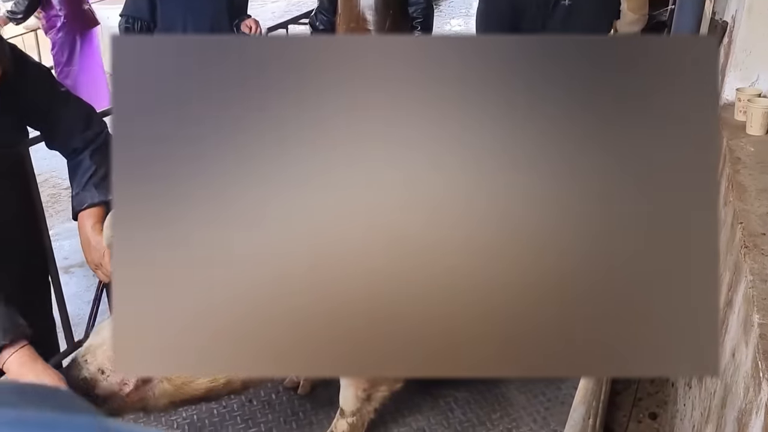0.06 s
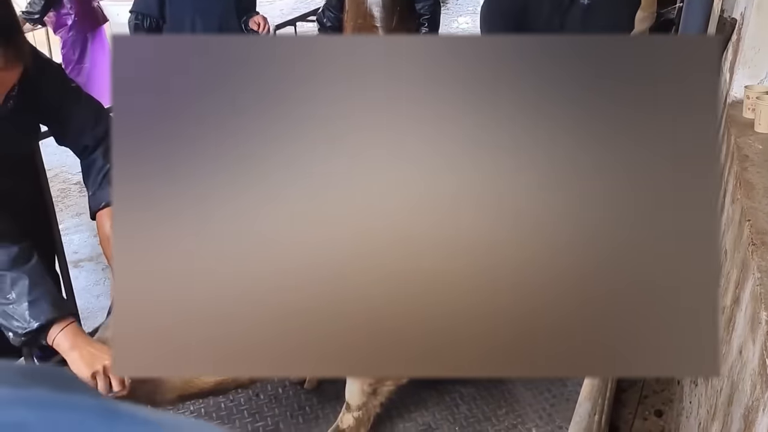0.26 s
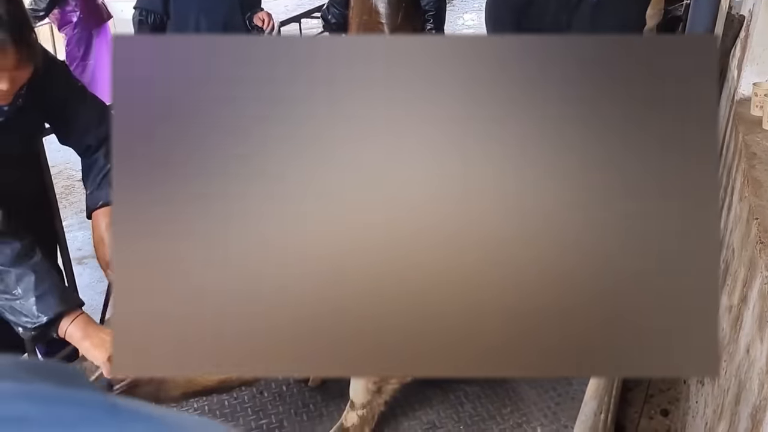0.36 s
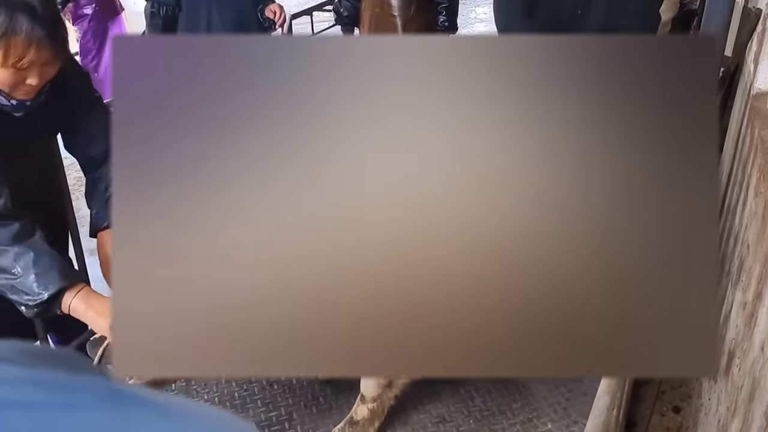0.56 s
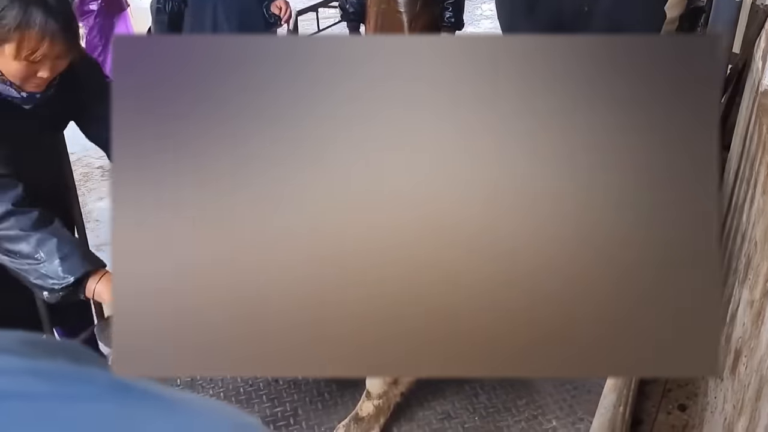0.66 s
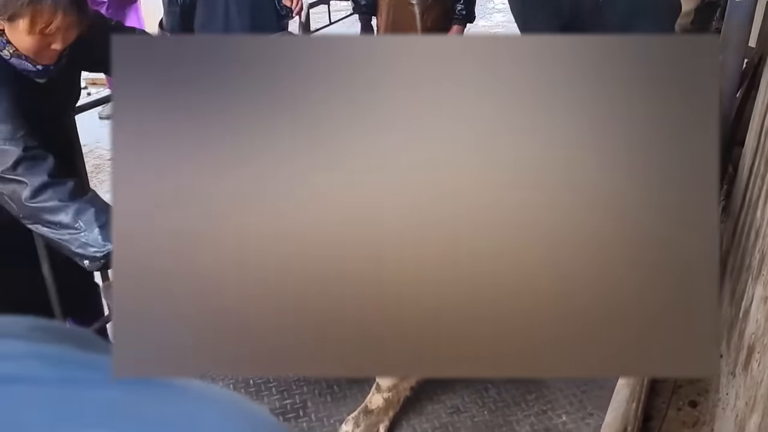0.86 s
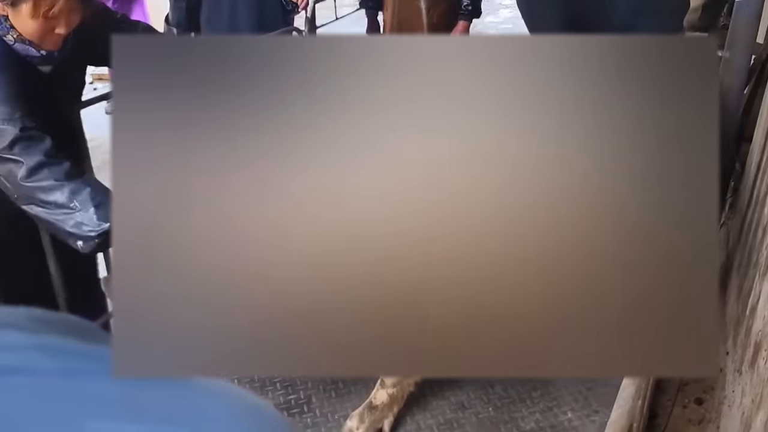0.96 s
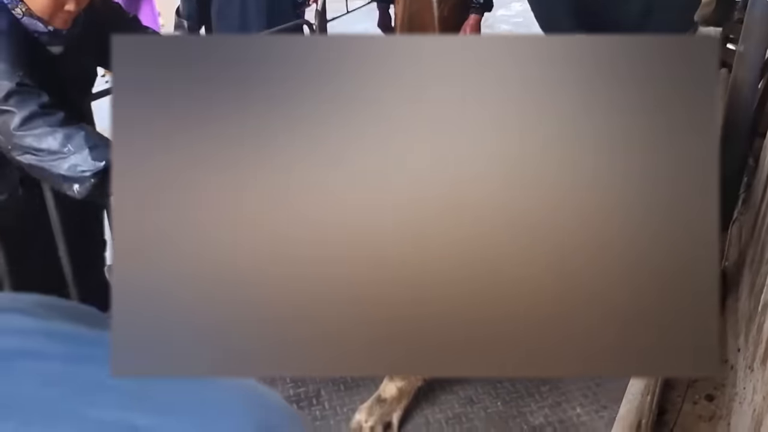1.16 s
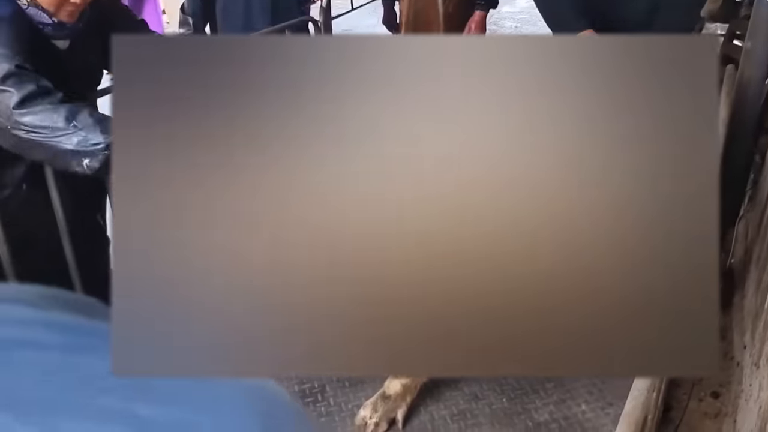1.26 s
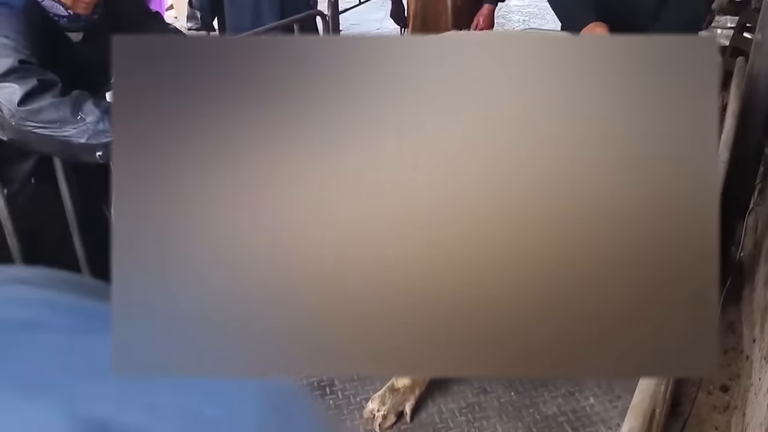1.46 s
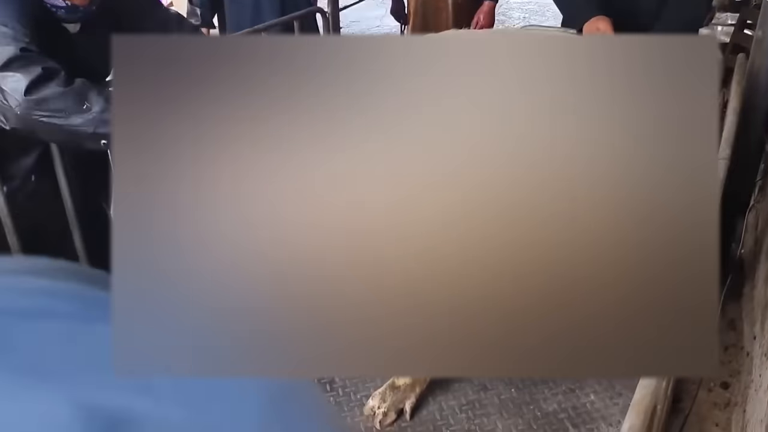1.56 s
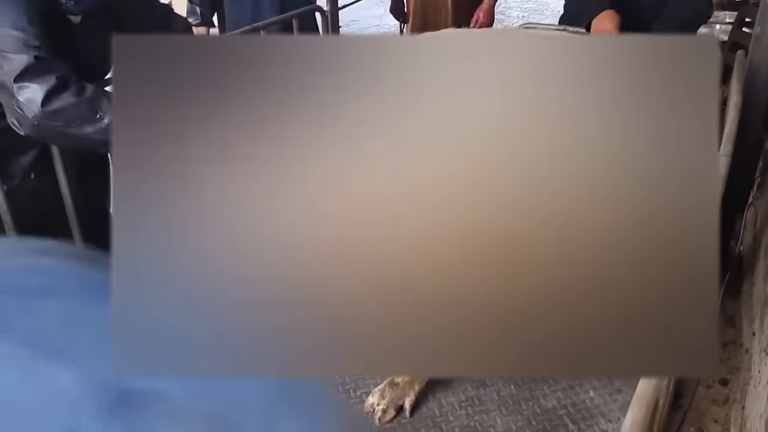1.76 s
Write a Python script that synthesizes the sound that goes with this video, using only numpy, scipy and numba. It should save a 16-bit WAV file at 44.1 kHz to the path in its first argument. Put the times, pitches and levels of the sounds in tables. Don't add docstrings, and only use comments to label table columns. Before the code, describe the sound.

A large pig, close and slightly left, growls from 0 to 0.75 s in a low, rattling flutter of about thirty flaps a second, swelling near 0.5 s. It becomes a hoot peaking around 0.87 s. A small grunt leads to a loud hoarse bark at 1.1-1.28 s, snorts near 1.38 s, a shorter airy bark at 1.5-1.6 s, then faint grunts. Short concrete reflections, low rumble and light hiss.

```python
import sys
import numpy as np
from scipy import signal
from scipy.fft import rfft, irfft, next_fast_len
from scipy.io import wavfile
from scipy.ndimage import uniform_filter1d, minimum_filter1d
from numba import njit

SR = 44100
rng = np.random.default_rng(int(sys.argv[2]) if len(sys.argv) > 2 else 0)


def linear_from_db(decibels):
    return 10 ** (np.asarray(decibels, float) / 20)


def inscribe(sig):
    pcm = np.round(np.clip(np.atleast_2d(sig).T, -1, 1) * 32767)
    wavfile.write(sys.argv[1], SR, pcm.astype(np.int16))


N = 79380
T = np.arange(N) / SR


def rms_one(x):
    return x / np.sqrt(np.mean(x ** 2) + 1e-20)


def coloured(points, channels):
    hz, db = np.transpose(points)
    f = np.maximum(np.arange(N // 2 + 1) * SR / N, 1)
    level_db = np.interp(np.log(f), np.log(hz), db)
    level_db = level_db - 30 * np.maximum(np.log(f / hz[-1]), 0)
    white = rfft(rng.standard_normal((channels, N)))
    return rms_one(irfft(white * linear_from_db(level_db), N))


# f/Hz, level per Hz/dB
PEN_SPECTRUM = [(30, 1.5), (140, 1.5), (370, 2.5), (610, 2.5), (900, 11), (1550, -27), (2120, -5.5),
                (7000, -58)]
PEN_DB = -46


def pen_background():
    noise = coloured(PEN_SPECTRUM, channels=3)
    return linear_from_db(PEN_DB) * (noise[0] + 0.2 * noise[1:])


# f/Hz, level per Hz/dB
HISS_SPECTRUM = [(5000, -0.5), (7000, -3), (8200, -16), (10200, -16), (11800, -11), (13200, -18.5),
                 (15000, -12)]
HISS_DB, HISS_START_DB, HISS_SETTLES_S = -47, 10.5, 0.21
HISS_FOLLOWS = 0.4


def microphone_hiss(pig):
    loud = uniform_filter1d(pig ** 2, size=1501) + 1e-5
    level = linear_from_db(HISS_DB + HISS_START_DB * np.exp(-T / HISS_SETTLES_S))
    return level * (loud / 0.011) ** (HISS_FOLLOWS / 2) * coloured(HISS_SPECTRUM, channels=2)


@njit
def glide(x, turn, r):
    y = np.zeros(len(x))
    for i in range(2, len(x)):
        y[i] = (1 - r * r) / 2 * (x[i] - x[i - 2]) + 2 * r * turn[i] * y[i - 1] - r * r * y[i - 2]
    return y


SKIRT = 0.3


def resonate(x, hz, width):
    turn = np.cos(2 * np.pi * hz / SR) * np.ones(N)
    r = np.exp(-np.pi * max(width * 1.4, 12) / SR)
    once = glide(x + 1e-18, turn, r)
    return SKIRT * once + (1 - SKIRT) * glide(once, turn, r)


PULSE_DB = [-3, -3, -5.5, -8.5, -11]
PULSE_GAP_S, PULSE_JITTER_S, PULSE_SOFT_HZ = 0.0067, 0.00044, 4400


def flap_source(flaps, starts, part, puff, rough, uneven_db):
    run = np.arange(len(PULSE_DB))
    draw = rng.standard_normal((len(starts), 2, len(run)))
    jitter = PULSE_JITTER_S * draw[:, 0] * (run > 0)
    when = starts[:, None] + PULSE_GAP_S * run + jitter
    pulses = np.zeros(N + SR)
    pulses[(np.abs(when) * SR).astype(int)] = linear_from_db(PULSE_DB + uneven_db * draw[:, 1]) * (when > 0)
    flaps_per_sample = len(starts) / (flaps[-1][0] - flaps[0][0]) / SR
    mixed = pulses[:N] / np.sqrt(flaps_per_sample) + rough * puff * rng.standard_normal(N)
    soft = signal.butter(2, PULSE_SOFT_HZ, fs=SR, output="sos")
    return signal.sosfilt(soft, mixed)


STRAIN_FROM_HZ = 2800
TWANG_LOW_HZ, TWANG_HIGH_HZ = 1700, 2800
FLAP_COLOUR_DB = 1.8


def vocal_tract(source, starts, tract, mouth, strain, lips, twang):
    draws = FLAP_COLOUR_DB * rng.standard_normal((len(starts), len(tract)))
    out = np.zeros(N)
    for k, (hz, width, db, share, rise) in enumerate(tract):
        level_db = db + np.interp(T, starts + PULSE_GAP_S, draws[:, k]) + share * mouth
        level_db = level_db + strain * (hz > STRAIN_FROM_HZ)
        level_db = level_db + twang * (TWANG_LOW_HZ < hz < TWANG_HIGH_HZ)
        sign = (-1) ** (k + (hz > 300))
        ring = resonate(source, hz * (1 + rise * lips), width) / np.sqrt(width / 50)
        out += sign * linear_from_db(level_db) * ring
    return out


# f/Hz, level per Hz/dB
AIR_SPECTRUM = [(2200, -1.5), (3600, 5), (5000, -13.5), (7000, -4), (8600, -57)]
PUFF_RISE, PUFF_FALL = 0.04, 0.5
CLOSING_DB = 9


def voice(flaps, effort, tract, rough, uneven_db, leak, air_db):
    s, count = np.transpose(flaps)
    starts = np.interp(np.arange(count[0], count[-1]), count, s)
    part = np.interp(T, s, count) % 1
    puff = leak + (1 - np.exp(-part / PUFF_RISE)) * np.exp(-part / PUFF_FALL) * (1 - part ** 4)
    source = flap_source(flaps, starts, part, puff, rough, uneven_db)

    s, level_db, *controls = np.transpose(effort)
    mouth, strain, lips, *twang = [np.interp(T, s, c) for c in controls]
    out = vocal_tract(source, starts, tract, mouth, strain, lips, sum(twang))
    out = signal.sosfilt(signal.butter(3, (38, 4700), "band", fs=SR, output="sos"), out)
    out = out * uniform_filter1d(linear_from_db(-CLOSING_DB * part ** 2), size=90)

    even = np.sqrt(uniform_filter1d(resonate(out, 500, 1470) ** 2, size=1501) + 1e-6)
    before_db = -99 if s[0] > 0.5 else level_db[0]
    fade_db = 400 * np.maximum(T - s[-1], 0)
    gain = linear_from_db(np.interp(T, s, level_db, left=before_db) - fade_db)
    air = coloured(AIR_SPECTRUM, channels=3)
    air = rms_one(puff) * (air[0] + 1.33 * air[1:])
    return gain * out / even, gain * linear_from_db(air_db + strain) * air


# t/s, flaps counted so far
GROWL_FLAPS = [(-.025, -1), (.031, 1), (.147, 5), (.260, 9), (.365, 13), (.396, 14), (.459, 16), (.586, 20),
               (.725, 25), (.756, 26), (.862, 29), (.96, 33)]
# t/s, level/dB, mouth opening/dB, strain/dB, lips drawn back/0-1, twang/dB
GROWL_EFFORT = [(0, -32, -3, 13.5, 0.53, 1.5), (.129, -33, -9.5, 19, 0.43, 8), (.3, -27, -2.5, 5, 0.35, 2),
                (.345, -25.5, -2, 12, 0.26, 5), (0.386, -27.5, -0.5, 0.5, 0.53, 4),
                (.411, -18, 1.5, 3.5, 0.64, -7), (.44, -24.5, 0.5, 16.5, 0.46, 1),
                (.475, -19.5, 0.5, 1, .3, -10.5), (.505, -16, 3.5, 13, 0.51, 6),
                (0.559, -16.5, 1, 8, 0.34, 6.5), (.63, -22.5, 0.5, 5.5, 0.18, -10),
                (0.688, -23, 1, 14.5, 0.15, 3.5), (0.744, -31, -8, 10, 0.46, 1.5),
                (.785, -34.5, -6.5, 5, 0.37, -9.5)]
# f/Hz, width/Hz, level/dB, share of mouth opening, rise with lips/0-1
SHUT_TRACT = [(57.7, 19, 6, 0.084, 0), (113.5, 19, 1.5, 0.16, 0.02), (195.9, 13.3, 2, -0.95, 0.02),
              (382, 39, -9, -0.79, 0), (471.3, 36, -0.5, -0.072, 0.14), (695, 14, 1.5, 0.14, 0.03),
              (801, 34.4, 3, 0.77, 0), (946, 120, -1.5, 1, 0), (1103.7, 31, 1, 0.57, 0.03),
              (1202, 52, -14.5, -0.59, 0.2), (2053, 37, -6.5, 0.37, .05), (2450, 90, -10, -0.82, 0.04),
              (3236, 140, -13, 1, 0.01), (3564, 46, -18, 0.91, 0.05)]
GROWL_UNEVEN_DB, GROWL_LEAK = 1.2, 0.14


def growl():
    return voice(GROWL_FLAPS, GROWL_EFFORT, SHUT_TRACT, rough=0.36, uneven_db=GROWL_UNEVEN_DB,
                 leak=GROWL_LEAK, air_db=-36.5)


# f/Hz, left minus right/dB, left lead/rad
PORTS = [(70, 0, 0.11), (248, 3.9, 0.1), (280, -31, 2.9), (450, 3.5, 1), (990, -2, 0.2), (1270, 6, 0.77),
         (2370, 2.5, 1.56), (5270, 3, 6.38)]


def microphone_ports(x):
    hz, db, lead = np.transpose(PORTS)
    f = np.log(np.maximum(np.arange(N // 2 + 1) * SR / N, 1))
    half_level = linear_from_db(np.interp(f, np.log(hz), db) / 2)
    half = half_level * np.exp(0.5j * np.interp(f, np.log(hz), lead))
    return irfft(rfft(x) * np.array([half, 1 / half]), N)


ROOM_DB, ROOM_T60_S, WALL_CUT_HZ, ROOM_LOW_HZ = -15, 0.23, 8200, 240


def concrete_walls(x):
    size = next_fast_len(N + SR)
    w = 2 * np.pi * np.arange(size // 2 + 1) / size
    dull = 1 / (1 + 1j * w * SR / (2 * np.pi * WALL_CUT_HZ))
    out = np.zeros((2, len(w)), complex)
    for k, lag in enumerate(rng.uniform(0.0033, 0.03, 16) * SR):
        loop = linear_from_db(-60 * lag / SR / ROOM_T60_S) * dull * np.exp(-1j * w * lag)
        out[k % 2] += (-1) ** (k // 2) * loop / (1 - loop)
    x = signal.sosfilt(signal.butter(2, ROOM_LOW_HZ, "high", fs=SR, output="sos"), x)
    return linear_from_db(ROOM_DB) * irfft(out * rfft(x, size), size)[:, :N]


# t/s, level/dB, mouth opening/dB, strain/dB, lips drawn back/0-1
HOOT_EFFORT = [
    (.75, -27.5, -0.5, 6, 0.23),
    (.765, -31, -5.5, 11, 0.18),
    (.8, -25, -0.5, 12, 0.2),
    (.838, -18, 2.5, 3, 1),
    (.855, -18, -2, 19, 1),
    (.872, -16.5, 12, -2.5, 0.8),
    (.895, -28.5, -0.5, 17.5, 0.82),
    (.93, -36.5, 9, 10.5, 1),
    (.975, -42.5, 21, -7.5, 1),
]
# f/Hz, width/Hz, level/dB, share of mouth opening, rise with lips/0-1
ROUND_TRACT = [(75.6, 15, 6.5, -0.35, -0.14), (130, 100, -8.5, -0.02, -0.093), (503, 33, -4.5, -0.47, .22),
               (799, 20, 2.5, 0.83, 0.0093), (1050, 220, -8.5, -.2, -0.089), (1254, 27, -12.5, -1.1, 0.036),
               (1760, 26, -25.5, .5, 0.033), (2200, 100, -9, -1.2, 0), (3200, 170, -18.5, 0.14, .03),
               (3604, 59, -22, 0.84, .02)]


def hoot():
    return voice(GROWL_FLAPS, HOOT_EFFORT, ROUND_TRACT, rough=0.2, uneven_db=GROWL_UNEVEN_DB,
                 leak=GROWL_LEAK, air_db=-32)


# t/s, flaps counted so far
GRUNT_FLAPS = [(.94, -3), (1.022, 0), (1.076, 2), (1.367, 12), (1.413, 14), (1.69, 24), (1.776, 27),
               (1.81, 28)]
GRUNT_STARTS_S = [.94, 1.021, 1.366, 1.389, 1.688, 1.775]
# length/s, level/dB, chest/dB, snort/dB
GRUNTS = [
    (0.1, -42, 3.5, -14),
    (0.086, -30.5, 0, 6.5),
    (0.03, -33, 1.5, 8.5),
    (0.043, -27.5, 2, 0),
    (0.059, -39, -31.5, -4),
    (0.091, -53, 24.5, -13),
]
# f/Hz, width/Hz, level/dB, share of chest, rise with lips/0-1
NOSE_TRACT = [(82, 28, -7, 1, 0), (206, 5.3, -11, 1, 0), (380, 19, -11.5, 0.69, 0),
              (774, 62, -9.5, -0.18, 0), (955, 39, 1, -0.54, 0), (1210, 120, -24, -1.75, 0),
              (1820, 110, -21, -1.57, 0), (2100, 810, -10, -0.97, 0), (3510, 490, -24, 0.18, 0)]
GRUNT_ATTACK_S, GRUNT_SAG_DB = 0.002, 7
BARK_UNEVEN_DB, BARK_ROUGH, BARK_LEAK = 2.0, 0.8, 0.3


def grunt_effort():
    effort = []
    for start, (length, db, chest, snort) in zip(GRUNT_STARTS_S, GRUNTS):
        length = min(length, 0.07)
        opening = chest - snort * (chest < -10)
        shape = [(-GRUNT_ATTACK_S, 40), (0, 0), (length - 0.008, GRUNT_SAG_DB), (length - 0.004, 40)]
        for at, loss in shape:
            effort.append((start + at, db - loss, opening, snort, 0))
    return effort


def grunts():
    return voice(GRUNT_FLAPS, grunt_effort(), NOSE_TRACT, rough=2.2, uneven_db=BARK_UNEVEN_DB,
                 leak=0.5, air_db=-27.5)


# t/s, flaps counted so far
BARK_FLAPS = [(1.088, 0), (1.121, 1), (1.186, 3), (1.253, 6), (1.35, 10), (1.453, 13), (1.488, 14),
              (1.557, 16), (1.66, 20)]
# t/s, level/dB, mouth opening/dB, strain/dB, lips drawn back/0-1, twang/dB
BARK_ONE_EFFORT = [
    (1.083, -41, -3, -3, 0.91, 3.5),
    (1.095, -10, 0, -6, 1, -4.5),
    (1.117, -15.5, 4, 3.5, 1, 3),
    (1.126, -9, 5.5, 7.5, 0.78, -22),
    (1.163, -9, 4.5, 6.5, 0.054, 3.5),
    (1.198, -11, -4, -2.5, 0.076, 3.5),
    (1.263, -16.5, 1.5, 5, 0, -2),
    (1.283, -33.5, -10.5, 4, 0.23, -6.5),
    (1.346, -38.5, 3.5, 8.5, 0.57, 1.5),
]
# f/Hz, width/Hz, level/dB, share of mouth opening, rise with lips/0-1
OPEN_TRACT = [(78, 19, -7, 0.16, -0.11), (221.3, 18.3, -6, 1, 0), (430, 160, -16, -0.086, -0.044),
              (802, 43, 0, 1, -0.02), (960.4, 38.3, 7.5, -0.6, -0.073), (1019, 42, -4, 0.85, 0),
              (1130, 26, -1.5, 1, 0.001), (1354, 18, -14, -.3, -0.031), (1480, 17, -12, 1, -0.037),
              (2048, 94, -5, 0.25, 0.13), (2220, 140, -16, 0.075, 0.052), (3040, 130, -14, 0, 0.028),
              (3380, 270, -22.5, 0.93, -0.03), (3825, 100, -26, .5, -0.024)]


def first_bark():
    return voice(BARK_FLAPS, BARK_ONE_EFFORT, OPEN_TRACT, BARK_ROUGH, BARK_UNEVEN_DB,
                 leak=BARK_LEAK, air_db=-35.5)


# t/s, level/dB, mouth opening/dB, strain/dB, lips drawn back/0-1
BARK_TWO_EFFORT = [
    (1.45, -28, -8.5, -1, 0),
    (1.458, -22, -18.5, 1.5, 0.13),
    (1.482, -28, -5, 6.5, 0),
    (1.503, -20, -8, -3.5, 1),
    (1.526, -12, 5.5, 3.5, 0),
    (1.544, -19, 6, 11.5, 0.67),
    (1.561, -11.5, 11, 2, 0),
    (1.589, -26, -3, 15, 1),
    (1.67, -43, -6, 11.5, 0.26),
]
# f/Hz, width/Hz, level/dB, share of mouth opening, rise with lips/0-1
WIDE_TRACT = [(80.8, 17, -8.5, 0.49, -0.018), (225.5, 17, -12.5, -0.49, 0), (408, 150, -14, -0.27, -0.066),
              (596, 48, -6.5, 0.27, 0.097), (819.3, 11, -3, 0.68, -0.0069), (880.3, 26.5, -2, 1, 0.059),
              (1000.6, 45, -3.5, -0.48, 0.082), (1310, 20, -14.5, 0.13, -0.096),
              (1778, 27, -14.5, 0.27, 0.025), (2048, 90, -12, -0.38, 0.005), (2250, 110, -13, -0.32, 0.038),
              (3280, 200, -19, -0.38, -0.031), (3550, 60, -15.5, 1, 0.075), (4180, 170, -23.5, 0.83, 0.069)]


def second_bark():
    return voice(BARK_FLAPS, BARK_TWO_EFFORT, WIDE_TRACT, BARK_ROUGH, BARK_UNEVEN_DB,
                 leak=BARK_LEAK, air_db=-30.0)


def scene():
    calls = [growl(), hoot(), grunts(), first_bark(), second_bark()]
    pig = sum(call for call, _ in calls)
    air = sum(rush for _, rush in calls)
    return microphone_ports(pig) + air + concrete_walls(pig) + pen_background() + microphone_hiss(pig)


def top_cut(x):
    return signal.sosfilt(signal.butter(12, 15040, fs=SR, output="sos"), x)


TOP, CUTOFF_HZ = 0.97, 15000


def record(dry):
    peak = np.abs(dry).max(axis=0)
    gain = minimum_filter1d(TOP / np.maximum(peak, TOP), size=301)
    gain = uniform_filter1d(gain, size=301)
    low_pass = signal.cheby2(10, 60, CUTOFF_HZ * 1.06, fs=SR, output="sos")
    mix = signal.sosfilt(low_pass, gain * dry)
    return top_cut(mix)


dry = scene()
out = record(dry)
inscribe(out)
```